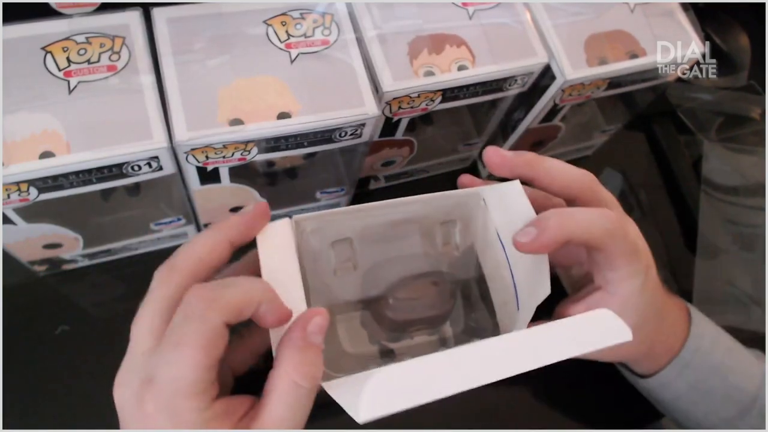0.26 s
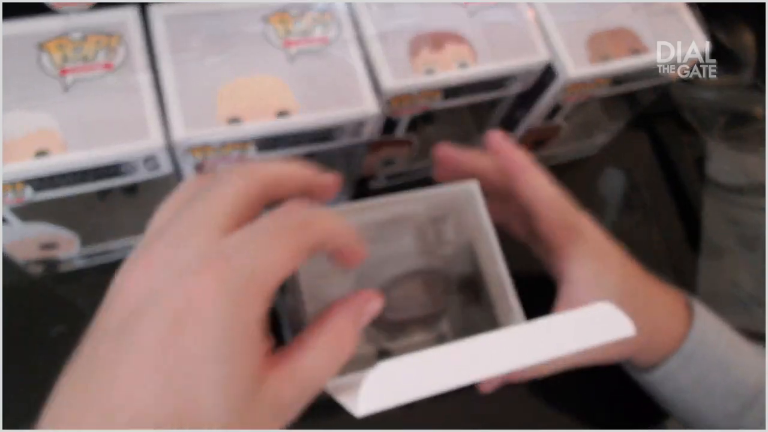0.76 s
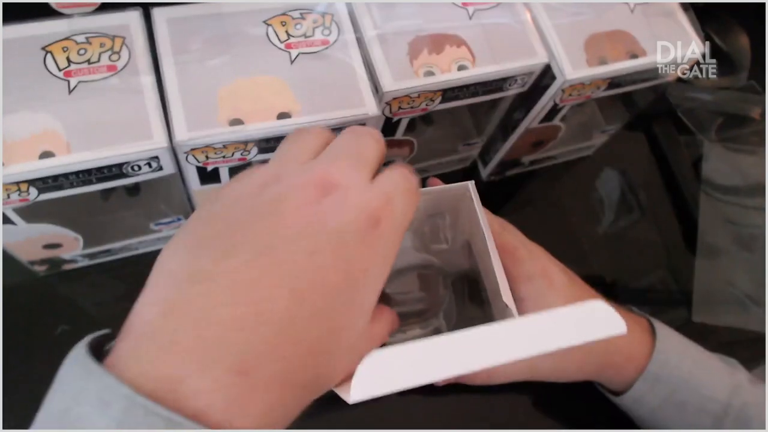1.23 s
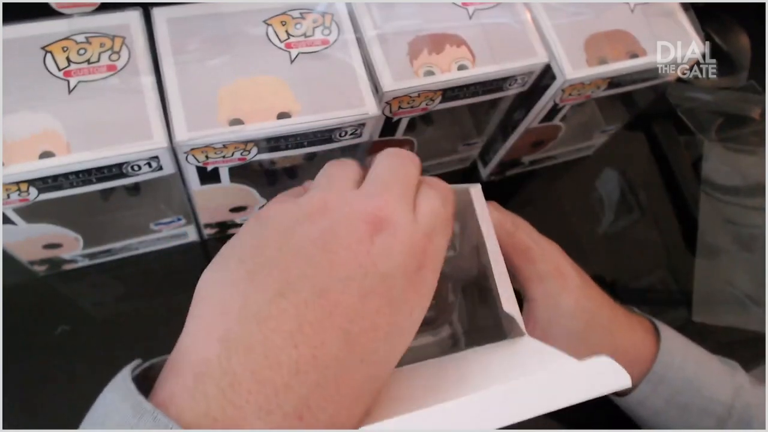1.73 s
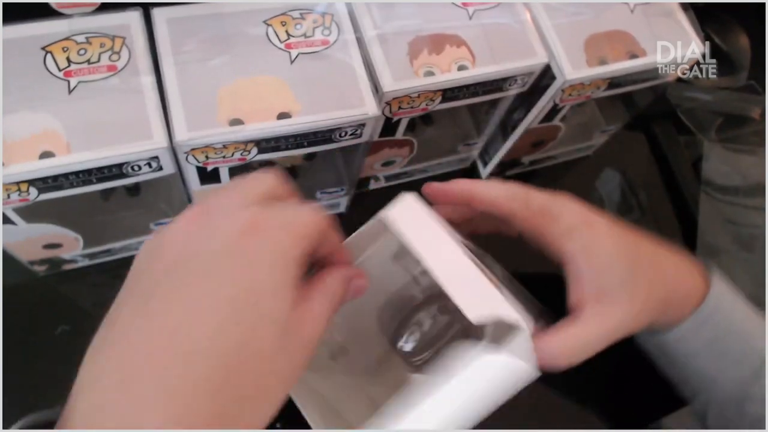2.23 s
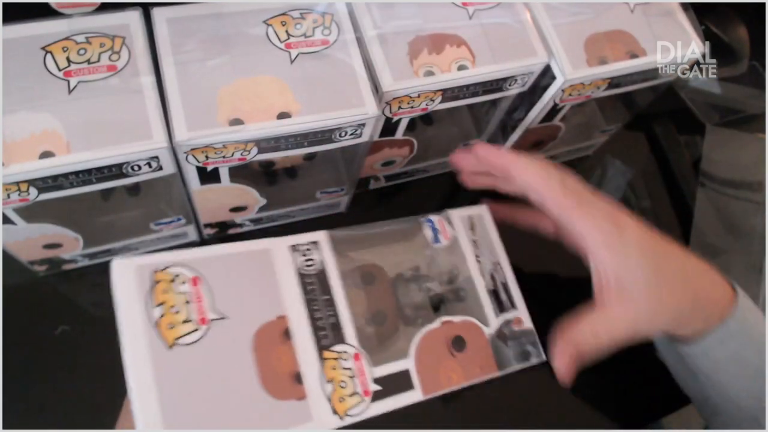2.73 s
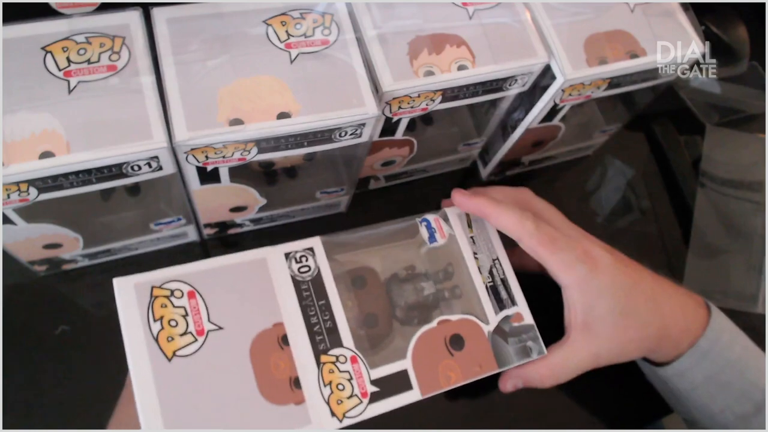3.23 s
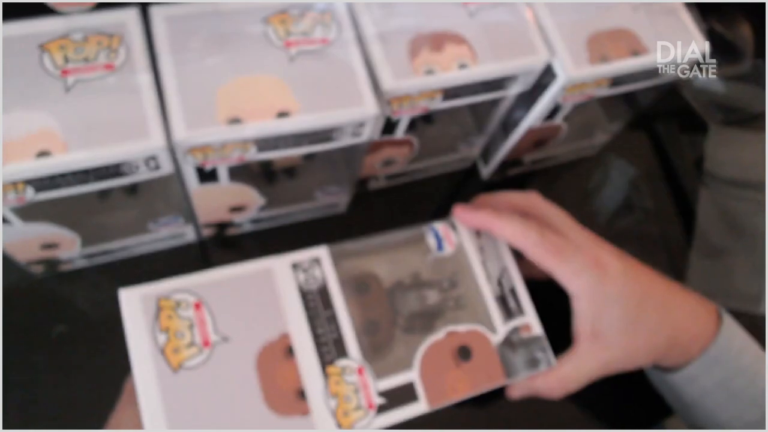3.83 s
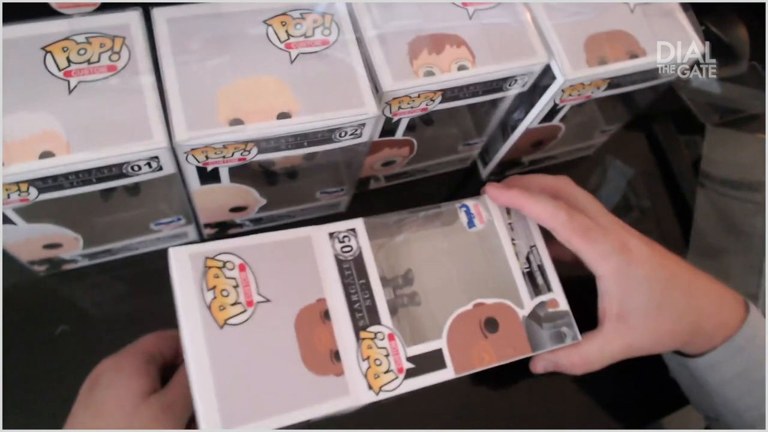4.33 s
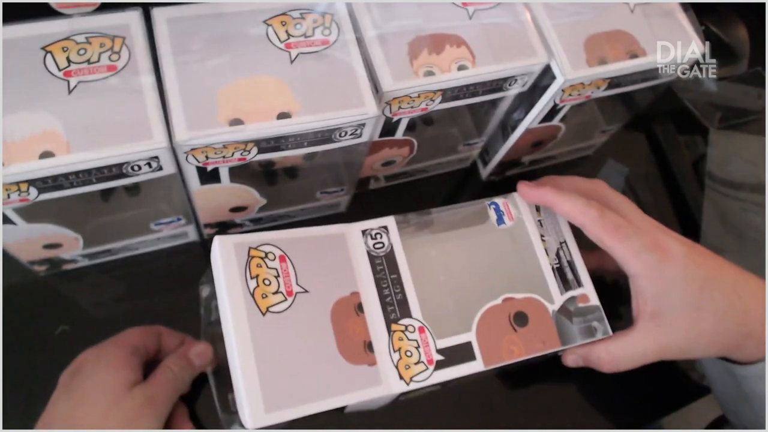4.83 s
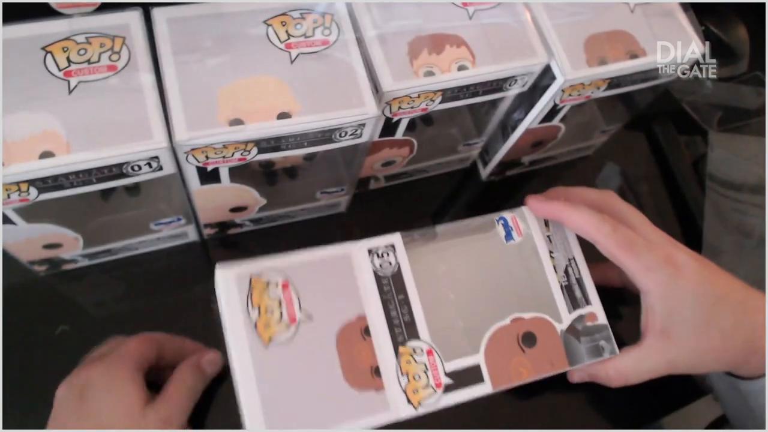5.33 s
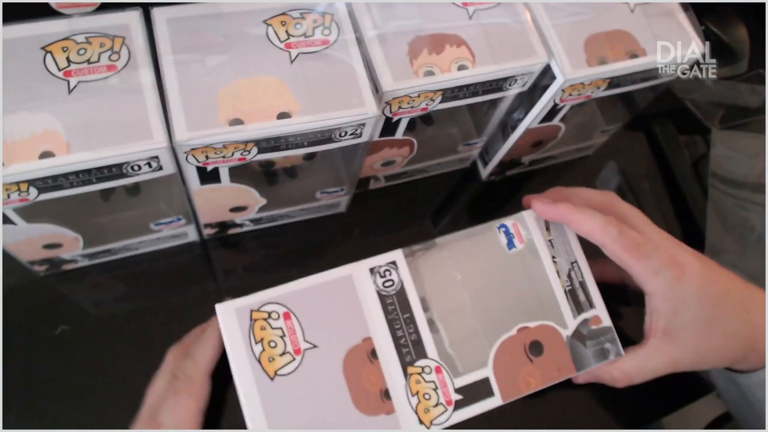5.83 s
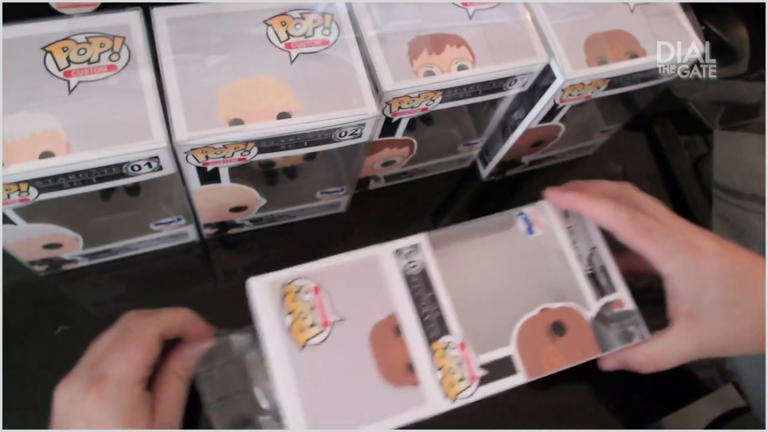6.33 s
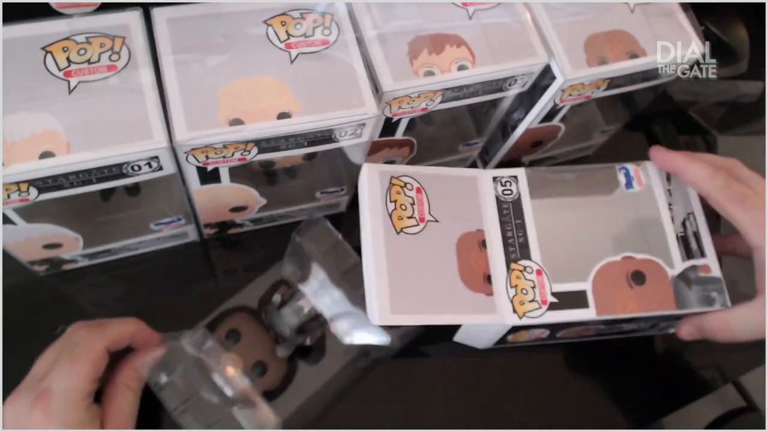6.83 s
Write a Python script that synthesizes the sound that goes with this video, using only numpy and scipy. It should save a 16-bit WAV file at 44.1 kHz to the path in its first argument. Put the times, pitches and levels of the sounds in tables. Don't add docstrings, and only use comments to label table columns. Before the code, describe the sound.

Close up in a small room, fingers knock lightly on a hollow thin card box and pry at stiff plastic with tiny snaps. The box is turned over with a low table thump, then card and film rub. A loud sharp crack bursts as the plastic jerks loose, followed by scrapes, a catch on the flaps and a run of bumpy drumming.

```python
import sys
import numpy as np
from scipy import signal
from scipy.fft import rfft, irfft
from scipy.io import wavfile
from scipy.ndimage import uniform_filter1d, map_coordinates

SR = 44100
rng = np.random.default_rng(int(sys.argv[2]) if len(sys.argv) > 2 else 0)


def level_to_linear(level):
    exponent = np.asarray(level, float) / 20
    return 10 ** exponent


def wav_out(sig):
    wavfile.write(sys.argv[1], SR, np.round(np.clip(np.atleast_2d(sig).T, -1, 1) * 32767).astype(np.int16))


N = 311787

# start_s, peak_db, treble_db, rattle_s (time to fall 60 dB)
SNAPS_PRYING = [(0.0834, -49, -42, 0.02), (0.327, -56.5, -26, 0.024), (0.3389, -49.5, -25, 0.02),
                (0.575, -54.5, -13, 0.091), (1.0296, -52.5, -18, 0.023), (1.099, -56, -27, 0.031),
                (1.1077, -50.5, -16, 0.043), (1.2142, -48, -18.5, 0.025), (1.2976, -59, -19, 0.03),
                (1.309, -54, -16, 0.016), (1.3287, -56.5, -10, 0.035), (1.366, -55, -26, 0.034),
                (1.507, -44, -15, 0.019), (1.6577, -52, -14, 0.024), (2.02, -44, -9, 0.055),
                (2.0993, -51, -12, 0.017), (2.1263, -49.5, -13, 0.018), (2.179, -45.5, -17.5, 0.023),
                (2.464, -49, -22, 0.082), (2.5444, -40.5, -16, 0.039), (2.813, -56, -13, 0.03),
                (2.842, -50, -13, 0.086)]
# start_s, peak_db, treble_db, rattle_s
SNAPS_TUGGING = [(3.034, -54, -12, 0.016), (3.092, -42.5, -16, 0.091), (3.208, -49.5, -16, 0.043),
                 (3.305, -43, -20, 0.01), (3.415, -47, -13, 0.019), (3.439, -46, -20, 0.058),
                 (3.512, -48.5, -15, 0.074), (3.5432, -34, -7.5, 0.029), (3.629, -46.5, -19, 0.042),
                 (3.645, -38, -3, 0.034), (3.7483, -44.5, -17, 0.035), (3.8601, -30, -3, 0.037),
                 (3.86, -17.5, -11.5, 0.02), (3.892, -23, -6, 0.034), (3.9503, -23.5, -10.5, 0.037),
                 (4.126, -41, -13, 0.018), (4.156, -43, -17, 0.017), (4.39, -51, -31, 0.036),
                 (4.494, -34, -6.5, 0.018), (4.799, -46, -16, 0.044), (4.9172, -51, -24, 0.022),
                 (4.9317, -43, -27, 0.011), (4.9446, -26, -22.5, 0.013)]
# start_s, peak_db, treble_db, rattle_s
SNAPS_LEAVING = [(5.1142, -52, -15, 0.033), (5.144, -45.5, -30, 0.13), (5.21, -39, -11.5, 0.03),
                 (5.28, -43, -19, 0.12), (5.379, -57, 0, 0.032), (5.4816, -47.5, -15, 0.23),
                 (5.512, -39.5, -18, 0.034), (5.5304, -32.5, -12, 0.017), (5.6092, -50, 4, 0.021),
                 (6.1033, -40.5, -20, 0.16), (6.125, -35, -4, 0.024), (6.284, -47, -13, 0.025),
                 (6.297, -42, -17, 0.053), (6.345, -35.5, -11, 0.018), (6.437, -30, -11, 0.028),
                 (6.534, -37, -18, 0.079), (6.599, -46, -16, 0.018), (6.6173, -41.5, -27, 0.037),
                 (6.6727, -44, -23, 0.23), (6.757, -48.5, -16, 0.015), (7.007, -38.5, -15, 0.059)]
# pitch_hz, level_db
FILM_TONE = [(880, -29.5), (1500, 0), (1850, -3.5), (2300, 0.5), (3550, -6), (5880, -8), (8490, -7.5),
             (12500, -15.5), (16000, -28)]


def unit(x):
    return x / np.sqrt(np.mean(x ** 2))


def colour(x, shape):
    hz, db = np.transpose(shape)
    size = 8192
    grid = np.maximum(np.arange(size // 2 + 1) * SR / size, 1)
    cepstrum = irfft(np.log(level_to_linear(np.interp(np.log(grid), np.log(hz), db))))
    cepstrum[1:size // 2] *= 2
    cepstrum[size // 2 + 1:] = 0
    response = irfft(np.exp(rfft(cepstrum)))[:len(x)]
    return signal.fftconvolve(x, response)[:len(x)]


def fade(t, t60):
    return np.exp(-np.log(1000) * t / np.maximum(t60, .002))


def add(out, s, sound, db):
    i = int(s * SR)
    sound = sound[:len(out) - i]
    out[i:i + len(sound)] += sound * level_to_linear(db) / np.abs(sound).max()


def grains(rate, scatter_db):
    hit = rng.random(N) < rate / SR
    strength = level_to_linear(scatter_db * np.minimum(rng.exponential(size=N), 2))
    return unit(hit * rng.standard_normal(N) * strength)


def flutter(rate, depth_db):
    k = int(SR / rate)
    steps = np.repeat(rng.standard_normal(N // k + 1), k)
    return level_to_linear(depth_db * uniform_filter1d(steps, k // 2)[:N])


def air():
    # pitch_hz, level_db
    air_tone = [(15, -19.5), (28, 6), (45, -5), (70, -47), (200, -13.5), (500, -16.5), (3000, -80),
                (8000, -37.5), (16000, -37)]
    # pitch_hz, level_db
    fan_hum = [(118.4, -76.5), (193.8, -78.5)]
    t = np.arange(N) / SR
    hum = 0
    for hz, db in fan_hum:
        hum = hum + level_to_linear(db) * np.sqrt(2) * flutter(3.8, 1.7) * np.sin(2 * np.pi * hz * t)
    return unit(colour(rng.standard_normal(N), air_tone)) * level_to_linear(-66) + hum


def room(x):
    # pitch_hz, fall_s (time to fall 60 dB)
    room_fall = [(200, 0.76), (700, 0.48), (2000, 0.41), (5000, 0.5), (12000, 0.24)]
    t = np.arange(SR // 2 + SR // 4) / SR
    hz, t60 = np.transpose(room_fall)
    tail = 0
    for centre in 125 * 2 ** np.arange(7.):
        low, high = centre / 2 ** .5, centre * 2 ** .5
        if centre > 7000:
            high *= 1.5
        octave = signal.butter(2, [low, high], "band", fs=SR, output="sos")
        band = signal.sosfilt(octave, rng.standard_normal(len(t)))
        tail = tail + band * fade(t, np.interp(np.log(centre), np.log(hz), t60))
    tail = tail * np.clip((t - .008) / 0.0098, 0, 1)
    return signal.fftconvolve(x, tail / np.sqrt(np.sum(tail ** 2)))[:N] * level_to_linear(-8)


def stirred(x):
    wander = 28 * np.log(flutter(45, 20 / np.log(10)))
    moments = np.arange(N) + uniform_filter1d(wander, 300)
    return map_coordinates(x, [moments], order=3, mode="nearest")


def shoving(t):
    # start_s, held_s, level_db
    shoves = [
        (.07, 0.016, -54.5),
        (2.49, 0.12, -52.5),
        (3.92, 0.15, -56.5),
        (5.29, 0.018, -61.5),
        (5.54, 0.03, -57),
        (6.15, 0.026, -58),
        (6.46, .29, -54),
        (7.0, 0.029, -56.5),
    ]
    rise_db_s, fall_db_s, rest_db = 298, 78, -71.5
    s, held, db = np.transpose(shoves)[:, :, None]
    before = rise_db_s * np.maximum(s - t, 0)
    after = fall_db_s * np.maximum(t - s - held, 0)
    return np.maximum((db - before - after).max(0), rest_db)


def table(boom_db):
    # start_s, pitch_hz, peak_db
    rocks = [
        (2.22, 33, -52.5),
        (2.47, 36, -47),
        (2.6, 77.6, -45.5),
        (2.79, 74, -56),
    ]
    shove = rng.standard_normal(N) * flutter(20, 1.5)
    top_modes = [(20, -35), (55, -0.5), (77, 2.0), (110, -1.5), (200, -6.5), (300, -46.0)]
    out = unit(colour(shove, top_modes)) * level_to_linear(boom_db)
    t = np.arange(SR // 4) / SR
    for s, hz, peak_db in rocks:
        swell = 1 - np.exp(-t / 0.0078)
        add(out, s, np.sin(2 * np.pi * hz * t) * fade(t, 0.54) * swell, peak_db)
    return out


def gripping(t):
    # time_s, card_db, film_db
    grip = [(0, -64.5, -76), (.15, -64.5, -80.5), (.87, -75, -76), (2.2, -70, -76.5), (2.55, -54.5, -67),
            (2.8, -69.5, -79), (3.05, -56.5, -66.5), (3.4, -64, -76), (3.842, -66, -72), (4.05, -53, -75),
            (4.45, -59, -64), (4.7, -68.5, -82.5), (4.95, -61, -62), (5.28, -58.5, -84), (5.45, -66.5, -79),
            (5.8, -74, -80), (6.1, -55.5, -64.5), (6.67, -56.5, -57), (6.85, -61.5, -86)]
    # centre_s, half_length_s, card_rise_db, film_rise_db (negative: a
    swells_and_dips = [(1.805, 0.072, 11.5, 8), (4.69, 0.015, 7, 16), (2.04, 0.024, 19, 14),
                       (3.935, 0.09, 14.5, 35), (5.178, 0.052, 5, 21), (5.59, 0.096, 19, 4), (3.7, 0.044, 4, 2),
                       (5.1, 0.014, -7, 3), (3.942, .008, -4, -3), (4.968, .02, -7, -2), (3.879, 0.011, -3, -4),
                       (6.34, 0.0092, 8, 11.5), (6.07, 0.021, -3.5, -2), (6.97, 0.037, -3, 13.5),
                       (0.032, 0.028, -3.5, -1), (4.8, 0.11, -0.5, 3), (5.122, 0.0088, 5, 5.5),
                       (6.645, 0.025, 5.5, 3.5), (5.79, 0.064, 11.5, -6), (5.525, 0.005, -6, -5),
                       (5.8, 0.052, -5, 8), (6.26, 0.052, 3, 1.5), (6.9, 0.074, 3, 11)]
    s, card_db, film_db = np.transpose(grip)
    card_db, film_db = np.interp(t, s, card_db), np.interp(t, s, film_db)
    for centre, half, card_rise_db, film_rise_db in swells_and_dips:
        swell = np.exp(-((t - centre) / half) ** 4)
        card_db = card_db + card_rise_db * swell
        film_db = film_db + film_rise_db * swell
    return card_db, film_db


def slipping(grip_db, under_db):
    loudest_db, t60_s = -29.5, 0.18
    kicks = np.zeros(N)
    for s, peak_db, *_ in SNAPS_PRYING + SNAPS_TUGGING + SNAPS_LEAVING:
        kicks[int(s * SR)] = level_to_linear(2 * (min(peak_db, loudest_db) + under_db))
    kicks = uniform_filter1d(kicks, size=600, origin=299)
    power = signal.lfilter([1], [1, -fade(2 / SR, t60_s)], kicks)
    return 10 * np.log10(level_to_linear(2 * grip_db) + power)


def rubbing(card_db, film_db, bright_db):
    # pitch_hz, level_db
    card_tone = [(88, -36), (150, -8.5), (286, -1), (407, -3.5), (953, 0), (1370, -3), (1980, -12),
                 (5000, -31), (6500, -30.5), (11000, -120)]
    card = 0.62 * grains(900, 0.49) + rng.standard_normal(N)
    card = unit(colour(card * flutter(35, 5.34), card_tone))
    edge = colour(card, [(900, -20.5), (1900, -4.5)])
    card = (card + (level_to_linear(bright_db) - 1) * edge) * level_to_linear(card_db)
    film = colour(grains(2700, 0.81) + rng.standard_normal(N), [(9000, -17.5), (15000, -17.0)])
    film = unit(colour(film * flutter(60, 2.0), FILM_TONE))
    crisp = colour(film, [(8000, -23), (14000, 5)]) * level_to_linear(film_db - film_db.max())
    return card + (film + crisp) * level_to_linear(film_db)


def ticks():
    # start_s, peak_db, centre_hz
    creases = [(3.8995, -29, 12500), (3.9511, -29, 12000), (4.677, -57, 8000), (4.9846, -43, 10500),
               (5.0037, -46, 8800), (5.024, -51, 9500), (5.124, -54, 7500), (5.281, -52, 12000),
               (5.321, -53, 9500), (6.15, -50, 9000), (6.5327, -35, 9000), (6.588, -49, 8600),
               (6.5982, -44, 8820), (6.6182, -46, 7500), (6.632, -48, 8000), (3.8605, -27, 13000),
               (1.004, -61, 5000), (1.015, -58, 5500), (1.207, -58, 7000), (0.305, -59, 2200),
               (0.586, -54, 2600), (0.169, -60, 2800)]
    out, t = np.zeros(N), np.arange(1000) / SR
    for s, peak_db, hz in creases:
        burst = rng.standard_normal(len(t)) * t ** .5 * fade(t, 0.011)
        add(out, s, colour(burst, [(hz / 2, -20), (hz, 0), (hz * 2, -27)]), peak_db)
    return out


def pings():
    # start_s, peak_db, pitch_hz
    prying = [(0.087, -49.5, 2220), (0.341, -55, 5130), (0.343, -55.5, 4350), (1.368, -49, 2230),
              (1.368, -47, 900), (2.472, -46, 220), (2.463, -52, 2510), (2.496, -53, 1640),
              (2.551, -43, 1170), (2.852, -51, 740), (2.6, -46.5, 229), (3.096, -49.5, 334),
              (3.106, -44, 734), (3.113, -45, 1460), (3.211, -46, 904), (3.23, -53, 430),
              (3.306, -47.5, 2440), (3.332, -54, 253), (3.546, -55, 4870), (3.546, -48, 5460),
              (3.548, -43.5, 3180), (3.559, -51, 6120), (3.65, -47, 3330), (3.752, -55, 1780)]
    # start_s, peak_db, pitch_hz
    tugging = [(3.862, -34, 6940), (3.863, -33, 5250), (3.87, -39, 6000), (3.878, -37, 5460),
               (3.894, -35, 5250), (3.902, -40, 4600), (3.902, -33, 2350), (3.908, -34.5, 468),
               (3.938, -41, 470), (3.954, -33.5, 4300), (3.956, -33, 950), (3.964, -38, 4950),
               (3.996, -37, 1160), (4.046, -53, 430), (4.116, -45.5, 1120), (4.13, -51, 1720),
               (4.14, -49, 386), (4.165, -50, 1060), (4.509, -47.5, 1270), (4.546, -52.5, 470),
               (4.929, -49, 1720), (4.946, -48, 6890), (4.946, -46, 6300), (4.948, -39.5, 1280),
               (4.951, -37.5, 389), (4.955, -50, 6150), (4.96, -41, 1790), (4.975, -40, 2080),
               (4.988, -42.5, 840), (5.025, -47.5, 2500), (5.126, -52, 1460), (5.284, -45.5, 1070),
               (5.286, -49, 2550), (5.487, -51.5, 1420), (5.504, -53, 2500), (5.515, -46, 975),
               (5.516, -50, 3270), (5.532, -46, 5600), (5.541, -47, 5250), (5.541, -49, 3010),
               (5.541, -49, 4250), (5.543, -37.5, 1360), (5.548, -51, 3580), (5.554, -40, 1460),
               (5.555, -47, 2870), (5.66, -54, 436)]
    # start_s, peak_db, pitch_hz
    leaving = [(6.102, -52, 3140), (6.118, -52, 5900), (6.123, -52, 2480), (6.129, -49, 2930),
               (6.152, -46, 1180), (6.181, -45, 425), (6.198, -52, 2840), (6.201, -33.5, 683),
               (6.299, -47.5, 4600), (6.3, -51, 1520), (6.347, -45.5, 3180), (6.347, -35, 930),
               (6.397, -47, 555), (6.439, -47, 5250), (6.439, -48, 6850), (6.44, -34, 830),
               (6.447, -45, 6500), (6.448, -35.5, 1350), (6.472, -50, 3450), (6.487, -45, 566),
               (6.543, -44.5, 3200), (6.543, -47, 3620), (6.549, -42, 302), (6.552, -42, 870),
               (6.562, -47, 2710), (6.579, -52, 2930), (6.597, -43.5, 484), (6.717, -46, 257),
               (7.003, -50, 2200), (7.012, -47, 3340), (7.018, -45.5, 1630), (7.023, -43.5, 2220)]
    # start_s, peak_db, pitch_hz
    drumming = [(2.468, -39.5, 593), (2.476, -40, 550), (2.484, -44, 660), (2.499, -45, 330),
                (2.52, -46, 500), (2.531, -50, 445), (2.557, -41, 484), (2.547, -45, 1000),
                (2.617, -46, 1160), (6.309, -53, 4600), (6.355, -41, 1150), (5.12, -51, 400)]
    out, t = np.zeros(N), np.arange(2000) / SR
    for s, peak_db, hz in prying + tugging + leaving + drumming:
        swell = 0.002205 * np.sqrt(1000 / hz)
        ring = t * np.exp(-t / swell) * np.sin(2 * np.pi * hz * t * (1.02 - 2 * t))
        add(out, s - 1.507 * swell, ring, peak_db + 3)
    return out


def snaps():
    # start_s, peak_db, treble_db, rattle_s
    crackle = [
        (0.169, -62, -24, 0.02),
        (0.2096, -60, -15, 0.082),
        (0.248, -58, -18, 0.029),
        (3.9001, -21.5, -7, 0.028),
        (3.913, -25.5, -5, 0.036),
        (5.54, -36.5, -17, 0.05),
        (6.4456, -35.5, -22.5, 0.026),
    ]
    # start_s, peak_db, treble_db, rattle_s
    give = [
        (3.848, -42, 0, 0.027),
        (3.855, -35, -11, 0.019),
    ]
    out, t = np.zeros(N), np.arange(3000) / SR
    for s, peak_db, treble_db, t60 in SNAPS_PRYING + SNAPS_TUGGING + SNAPS_LEAVING + crackle + give:
        noise, stutter = rng.standard_normal((2, len(t)))
        stutter = level_to_linear(24 * uniform_filter1d(stutter, 60))
        build = 1 - np.exp(-t / (0.047 * t60))
        burst = noise * stutter * fade(t, t60) * build
        stiff = [(4500, 0.019), (8000, treble_db + 15.0), (16000, treble_db + 12.5)]
        add(out, s, colour(colour(burst, FILM_TONE), stiff), peak_db + 3.0)
    return out


def taps():
    # pitch_hz, level_db, fall_s (time to fall 60 dB)
    box_modes = [(232.5, 6.5, 0.059), (338, -41, 0.019), (425, 8.5, 0.049), (530, 16.5, 0.014),
                 (652, -6, 0.087), (770, 4, 0.018), (951.5, 3.5, 0.022), (1090, -3.5, 0.04),
                 (1201, -3, 0.024), (1606, 0.5, 0.0093), (1700, -41, 0.045), (2058, -22, 0.055),
                 (2380, -19, 0.027)]
    # pitch_hz, level_db
    wall_tone = [(80, -34), (220, -4), (330, -2), (2600, 1), (4000, -0.5), (9000, -55)]
    # start_s, peak_db, panel_hz, upper_modes_db, cavity_modes_db
    prying = [(0.057, -45, 374, -14, -6), (0.085, -31.5, 676, -5.5, -2), (0.573, -43.5, 1030, -6, -2.5),
              (0.636, -53, 360, -3, 1), (1.005, -50, 1000, -9, -5), (1.098, -47.5, 960, -23, -6),
              (1.108, -49.5, 1090, -23, -18), (1.214, -41.5, 1314, -12, -10), (1.366, -29.5, 495, -2, -43),
              (1.506, -50.5, 1090, -21, -29), (1.661, -37, 405, -8, -14.5), (2.025, -44, 1015, -3, -2),
              (2.126, -48.5, 970, -10, -26), (2.177, -46, 970, -1, -23), (2.21, -46, 1005, -5, -24),
              (2.254, -43, 1040, 3.5, -6), (2.302, -51, 370, -22, 7), (2.325, -51.5, 1090, -4, -7)]
    # start_s, peak_db, panel_hz, upper_modes_db, cavity_modes_db
    turning = [(2.355, -37.5, 500, -11, -9), (2.462, -35.5, 652, -16, -34), (2.542, -32, 764, -4, -19),
               (2.812, -56.5, 780, -37, -34), (2.85, -44.5, 258, -40, -10.5), (3.034, -53, 425, -15, -7),
               (3.068, -38.5, 770, -19, -2), (3.091, -32.5, 1105, -6, -8), (3.207, -44, 910, -3, -6),
               (3.303, -39.5, 875, -5, -13), (3.415, -42, 984, -5.5, -27.5), (3.512, -42.5, 1010, -2, -30),
               (3.542, -39, 1115, -17, -23), (3.627, -47, 850, -2, -14.5), (3.646, -40.5, 1145, -12, -11),
               (3.749, -44.5, 1220, 1, -33)]
    # start_s, peak_db, panel_hz, upper_modes_db, cavity_modes_db
    tugging = [(3.849, -46, 794, -27, -23), (3.859, -25, 1048, -20, -9), (3.9, -28, 1013, -14, -23),
               (3.951, -33.5, 426, -39, -45), (4.154, -39.5, 392, -15, -15), (4.303, -48, 415, -20, -3),
               (4.494, -32.5, 395, -6, -8), (4.678, -48, 770, 8, -13), (4.9433, -24.5, 1860, 9, -30),
               (4.983, -41, 380, -3, -29), (5.113, -42.5, 403, -2, -21), (5.196, -45, 2310, -8, -8),
               (5.28, -34.5, 425, -4.5, 0), (5.484, -40.5, 1090, -5, -38), (5.513, -43, 1740, -25, -33),
               (5.541, -27, 1060, -2.5, -19)]
    # start_s, peak_db, panel_hz, upper_modes_db, cavity_modes_db
    leaving = [(6.097, -57, 880, -16, -17), (6.126, -37.5, 430, -26, -34), (6.197, -36.5, 690, -16, -6),
               (6.285, -39.5, 736, -17, -15), (6.344, -29, 883, -17, -14), (6.437, -26.5, 707, -27, -12),
               (6.541, -25.5, 890, 6, -19), (6.622, -26.5, 950, 4, -15), (6.755, -39.5, 490, 16, -24),
               (6.955, -43.5, 950, 1, -31), (7.01, -32.5, 1000, 3, -17)]
    # start_s, peak_db, panel_hz, upper_modes_db, cavity_modes_db
    further_knocks = [(0.338, -47.5, 1090, -21, -1.5), (2.488, -36.5, 620, -13, 3), (2.554, -31.5, 455, -6, -11),
                      (2.598, -36.5, 367, -3, -14.5), (3.103, -43, 1090, -17, -9), (3.912, -25, 973, -14, -2.5),
                      (3.993, -37, 700, -22, -32), (4.947, -36.5, 400, -9, -26), (6.351, -32, 920, -12, -13),
                      (6.449, -32, 463, -19, -17), (6.551, -27.5, 1310, -7.5, -6), (6.579, -38, 470, -34, -6),
                      (6.715, -44, 281, -27, -7)]
    out, t = np.zeros(N), np.arange(3000) / SR
    hz, db, t60 = np.transpose(box_modes)[:, :, None]
    for s, peak_db, panel_hz, upper_db, cavity_db in prying + turning + tugging + leaving + further_knocks:
        spot = rng.standard_normal((len(box_modes), 1))
        tilt = np.where(hz > 1300, upper_db + 13, np.where(hz < 560, cavity_db - 0.5, 0))
        tones = np.sin(2 * np.pi * hz * (1 + .02 * spot) * t)
        modes = level_to_linear(db + tilt + 1.5 * spot) * tones * fade(t, t60)
        panel = level_to_linear(7) * np.sin(2 * np.pi * panel_hz * t) * fade(t, .03)
        ragged = 0.035 * rng.standard_normal(len(t)) ** 3
        push = ragged * fade(t, 0.027 * level_to_linear(-0.2 * upper_db)) * (1 - np.exp(-t / 0.0035))
        push[40] += 1
        rise = 1 - np.exp(-t / (0.00031 * level_to_linear(-.6 * upper_db)))
        add(out, s, signal.fftconvolve((modes.sum(0) + panel) * rise, push), peak_db + 2.5)
    return colour(out, wall_tone)


def scene():
    t = np.arange(N) / SR
    card_db, film_db = gripping(t)
    bright_db = np.where(t < 4.1, 1.5, 11)
    rub = rubbing(slipping(card_db, -16.5), slipping(film_db, -19.5), bright_db)
    near = taps() + snaps() + pings() + rub
    far = stirred(room(colour(near, [(150, -5.0), (800, -0.5)])))
    return (near + far + table(shoving(t)) + air() + ticks())[None]


def band_limit(x):
    return signal.sosfilt(signal.butter(12, 16085, fs=SR, output="sos"), x)


def record(dry):
    cut = signal.ellip(10, .3, 70, 16150, fs=SR, output="sos")
    mix = signal.sosfilt(cut, dry)
    return band_limit(mix)


dry = scene()
out = record(dry)
wav_out(out)
```